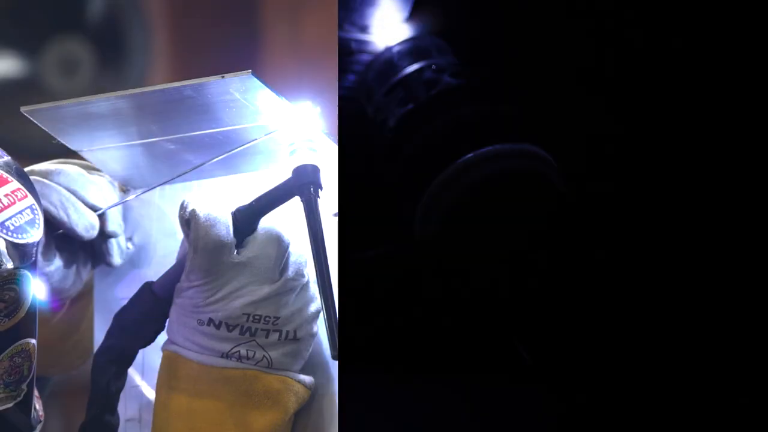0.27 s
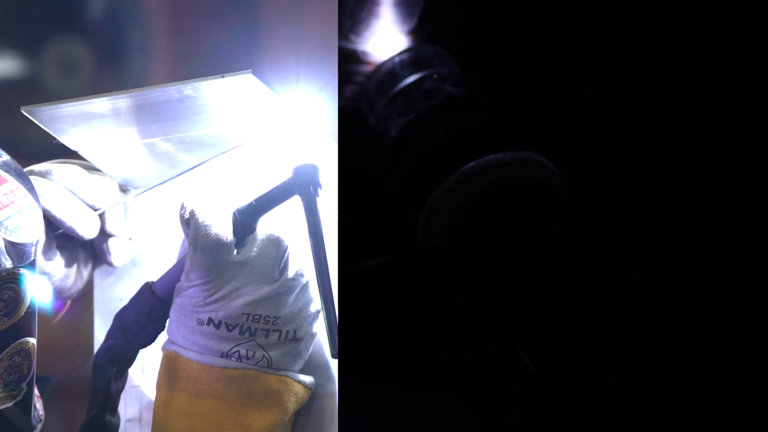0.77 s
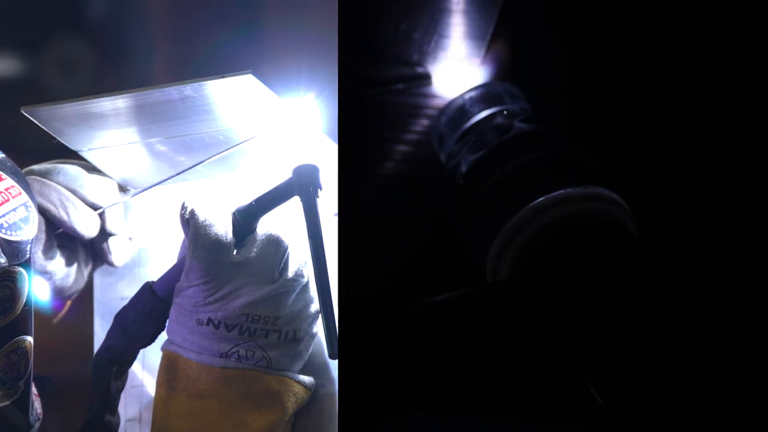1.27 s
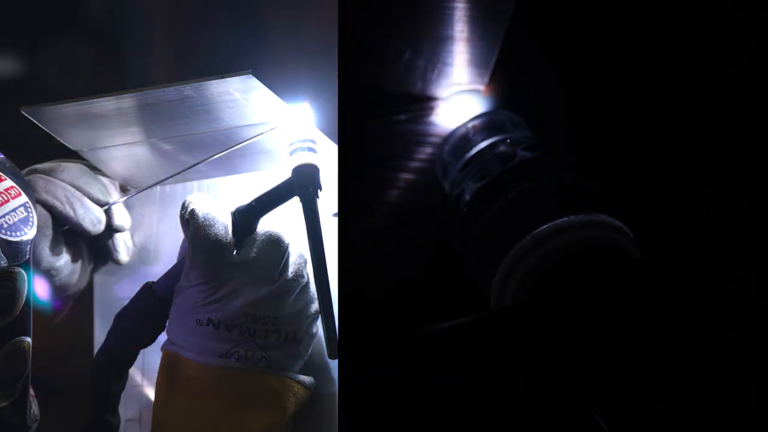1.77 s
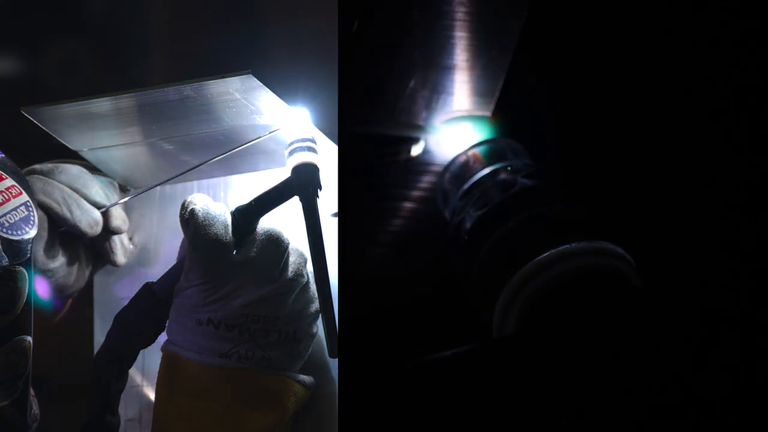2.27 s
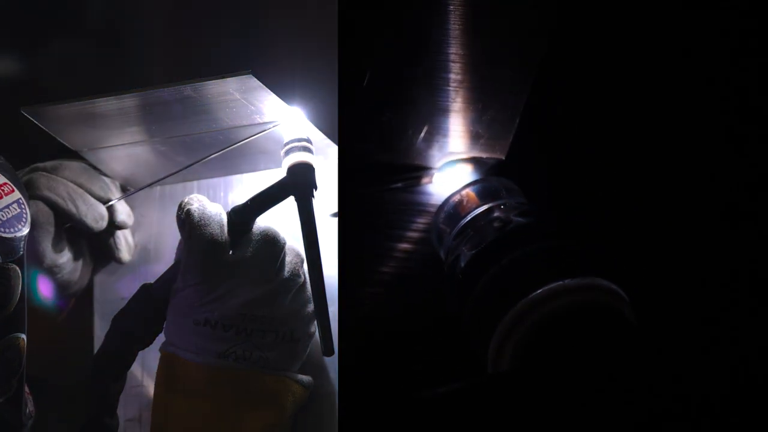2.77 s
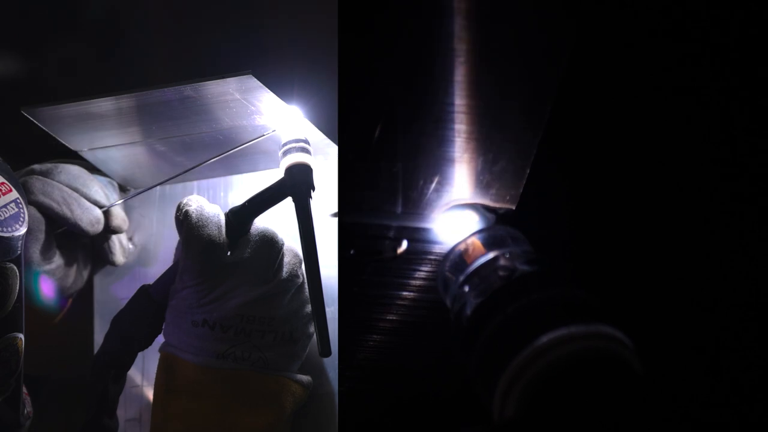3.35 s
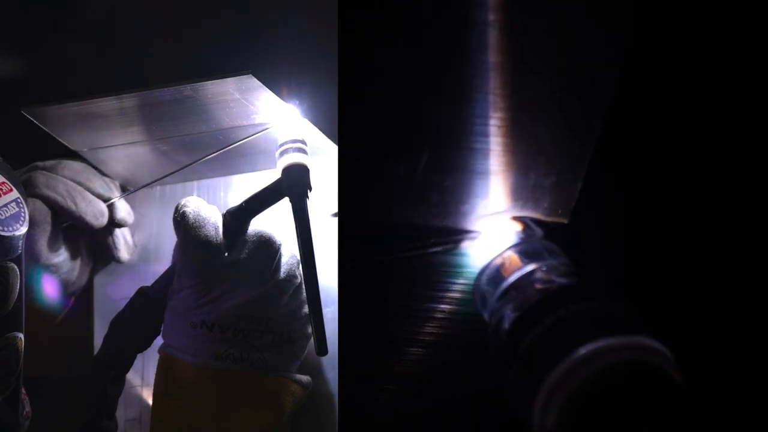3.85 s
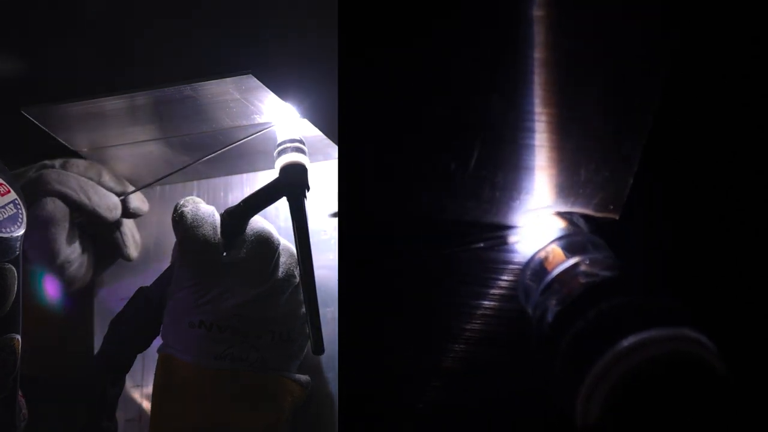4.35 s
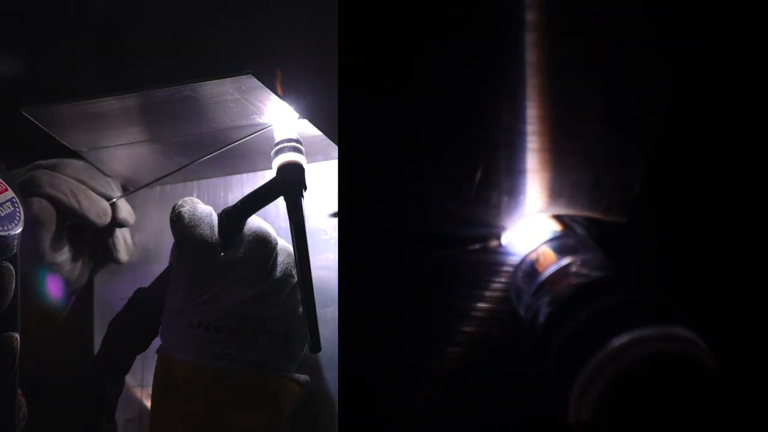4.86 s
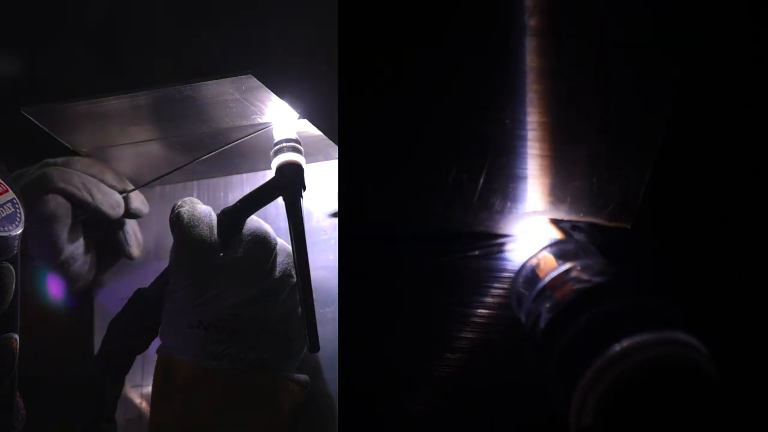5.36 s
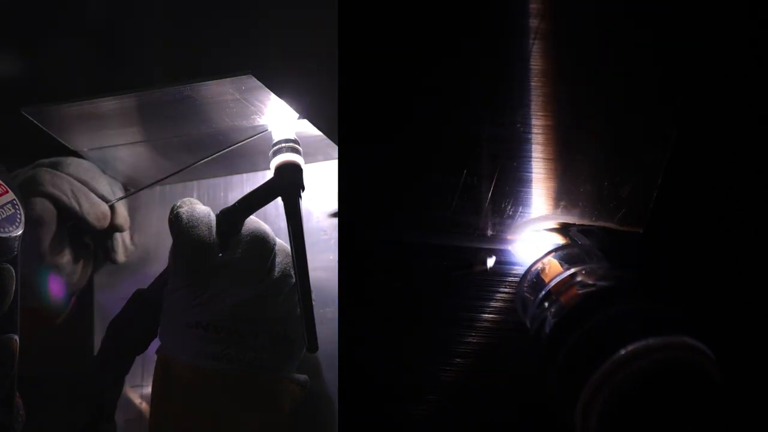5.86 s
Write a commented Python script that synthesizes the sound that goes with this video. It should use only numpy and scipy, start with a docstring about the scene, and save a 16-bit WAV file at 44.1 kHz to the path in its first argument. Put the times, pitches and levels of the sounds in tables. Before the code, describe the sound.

In a workshop, a faint fan hum and soft room noise come first. A welding arc catches with a brief crackle of snaps and thuds, then settles into a harsh, steady low-pitched buzz with a bright, metallic edge and thin hiss. Its rasp grows rougher in patches midway. At the very end two quick blows hit the bench and ring. Close microphone, short reflections.

```python
"""An alternating-current welding arc strikes with a sputter and settles into a steady buzz in a workshop.
The current reverses twice a cycle; each reversal is a click that sets damped resonances ringing:
a crack that echoes between nozzle and plates, and a thump of the plates, which the magnetic force also sways.
A fan hums as a wavering sine, shop and shielding gas sound as shaped noise, and the arc adds its own hiss.
Near the end two quick blows on the bench ring its modes and leave a decaying tail."""
import sys
import numpy as np
from scipy import signal
from scipy.fft import rfft, irfft, next_fast_len
from scipy.io import wavfile

SR = 44100
rng = np.random.default_rng(int(sys.argv[2]) if len(sys.argv) > 2 else 0)


def to_wav(sig):
    """Store sig (one row per channel, or 1-D mono) as 16-bit WAV at the path in sys.argv[1].

    Samples outside -1..1 are clipped; the rate is SR.
    """
    pcm = np.clip(np.atleast_2d(sig), -1, 1) * 32767
    pcm = np.round(pcm).astype(np.int16)
    wavfile.write(sys.argv[1], SR, pcm.T)  # frames by channels


N = 270156
TIME_S = np.arange(N) / SR
CYCLE_HZ, FIRST_CYCLE, SECOND_REVERSAL = 161.015, 53, .617   # the last: share of a cycle after the first
SPUTTER_START_S, SPUTTER_END_S = .217, .335

# the sinking background: time_s, level_db
FADE = [(0., -0.5), (.18, -1), (.3, -6.5), (.5, -4.5), (1.6, -6), (2.7, -9), (3.2, -11), (4.3, -9.5),
        (4.6, -12), (5.3, -9), (5.9, -11)]
# click strengths of the arc: time_s, crack_db, thump_db
ARC_STRENGTH = [(.34, -45, -43), (.38, -35, -36), (.5, -35, -33.5), (.8, -31, -30.5), (1.3, -29, -27.5),
                (1.65, -31, -30.5), (2.05, -30.5, -28), (2.4, -33.5, -31), (2.75, -30, -31),
                (3.3, -34, -34.5), (3.55, -33.5, -34.5), (3.95, -31, -32), (4.5, -31, -33.5),
                (4.8, -34.5, -36), (5.1, -30.5, -33), (5.3, -31.5, -34), (5.5, -33, -33.5),
                (5.9, -34.5, -35.5), (6.12, -34, -34)]
# the torch travels along the joint: time_s, arrival_ms, then four echo heights (ratio to the crack)
TORCH_TRAVEL = [(.45, .075, .62, -.4, .7, 1.2), (1., .133, .55, -.26, .75, .87),
                (1.6, .157, .79, .21, .6, .7), (2.33, .2, .9, .3, .6, .7), (2.8, .232, 1.13, .6, .72, .55),
                (3.1, .244, 1.1, .67, .6, .38), (3.7, .236, 1.36, .6, .85, .5),
                (4.3, .21, 1.43, .92, .5, .16), (4.47, .208, 1.45, .89, .47, .1),
                (4.65, .147, 1.41, .8, .74, .28), (4.9, .124, 1.55, .89, .7, .12),
                (5.15, .116, 1.46, 1., .4, .15), (5.5, .083, 1.62, .97, .32, -.1),
                (6.1, .075, 1.6, 1.07, .5, .17)]
# delays of those echoes, off the nozzle rim, then three faces of the joint: lag_ms
ECHO_LAGS_MS = (.16, .4, .513, .617)


def amp(db):
    """Decibels to amplitude ratio, by the logarithmic definition of level."""
    return 10 ** (np.asarray(db) / 20)


def rms_one(x):
    """Normalisation to unit root-mean-square."""
    return x / np.sqrt(np.mean(x ** 2) + 1e-20)


def read(rows, t):
    """Linear interpolation of a table's columns at times t."""
    s, *columns = np.transpose(rows)
    return [np.interp(t, s, c) for c in columns]


def coloured(spectrum):
    """Spectral shaping: steady white noise weighted over log frequency, at rms 1."""
    size = next_fast_len(N)
    hz = np.maximum(np.arange(size // 2 + 1) * SR / size, 1)
    points = np.array(spectrum)
    gain = amp(np.interp(np.log(hz), np.log(points[:, 0]), points[:, 1]))
    white = rng.standard_normal(size)
    return rms_one(irfft(rfft(white) * gain, size)[:N])


def drift(rate_hz):
    """Low-pass random motion: noise through a double pole, at rms 1."""
    r = np.exp(-2 * np.pi * rate_hz / SR)
    white = rng.standard_normal(N + SR)
    return rms_one(signal.lfilter([1], [1, -2 * r, r * r], white)[SR:])


def clicks(times, sizes):
    """Band-limited impulses: windowed sincs between samples keep the harmonics of a steady train clean."""
    at, taps = np.asarray(times)[:, None] * SR, np.arange(-8, 9)
    index = np.round(at).astype(int) + taps
    shape = np.sinc(index - at) * np.cos(np.pi * (index - at) / 19) ** 2
    heights = shape * np.asarray(sizes)[:, None]
    return np.bincount(index.ravel(), heights.ravel(), N + SR)[:N]


def ring(train, modes):
    """Modal impulse response: each click sets damped sines ringing, normalised to a peak of 1."""
    t = np.arange(2048) / SR
    body = sum(amp(db) * np.exp(-np.pi * width * t) * np.sin(2 * np.pi * hz * t) for hz, width, db in modes)
    return signal.fftconvolve(train, body / np.abs(body).max())[:N]


def band(x, low_hz, high_hz, order):
    """Butterworth band-pass: maximally flat between the two corners."""
    return signal.sosfilt(signal.butter(order, [low_hz, high_hz], "band", fs=SR, output="sos"), x)


def fan_hum(fade_db):
    """Frequency modulation: a sine whose pitch wanders; it sinks faster than the noise."""
    pitch_hz = 286.2 + 1.31 * drift(3.0)
    phase = 2 * np.pi * np.cumsum(pitch_hz) / SR
    return np.sqrt(2) * amp(-46 + 1.49 * fade_db) * np.sin(phase)


def shop_and_gas(fade_db):
    """Turbulence and diffuse room sound: two coloured noises under one slow fade."""
    # shop noise spectrum, relative density: frequency_hz, density_db
    shop_spectrum = [(25, -4), (60, -15), (130, -7), (250, 1.5), (450, 4.5), (900, -1.5), (1400, -7.5),
                     (2400, -7.5), (3500, -22), (6000, -30), (14000, -38)]
    # shielding gas spectrum, relative density: frequency_hz, density_db
    gas_spectrum = [(2060, -34), (3500, -13), (4740, -22), (5830, -24), (7180, -17), (8570, -16),
                    (9500, -5), (10300, -5), (11200, -3.5), (13100, -22), (15800, -36)]
    return amp(fade_db) * (amp(-51) * coloured(shop_spectrum) + amp(-62.5) * coloured(gas_spectrum))


def arc_hiss():
    """Amplitude-modulated band noise: its level follows the cracks from the strike onward."""
    crack_db = read(ARC_STRENGTH, TIME_S)[0]
    noise = rms_one(band(rng.standard_normal(N), 3900, 5500, order=2))
    return amp(-48 + crack_db) * (TIME_S > SPUTTER_START_S) * noise


def background():
    """Superposition of the fan tone, shop noise, gas hiss and arc hiss."""
    fade_db, = read(FADE, TIME_S)
    return fan_hum(fade_db) + arc_hiss() + shop_and_gas(fade_db)


def sputter():
    """Random point process: tiny sparks of chance size and sign fly while the arc strikes."""
    sparks_per_s, level_db, spread_db = 1500, -49, 4
    striking = (TIME_S > SPUTTER_START_S) & (TIME_S < SPUTTER_END_S)
    born = (rng.random(N) < sparks_per_s / SR) & striking
    return born * amp(level_db + spread_db * rng.standard_normal(N)) * rng.choice([-1, 1], N)


def sparks_and_pops():
    """Impulsive discharge: unsteady pops each give a spark and a damped thud; returns sparks and pops."""
    # pops, click levels ahead of the filters: time_s, thud_db, snap_db
    pop_rows = [(.2168, -20, -28), (0.224, -38, -27), (.2303, -29, -29), (0.2366, -21, -38),
                (.246, -43, -43), (0.252, -37, -37), (.2583, -24.5, -30), (.267, -45, -38),
                (0.273, -34, -41), (.281, -40, -29), (0.2824, -29, -28), (.288, -38, -43),
                (0.295, -25, -38), (0.2987, -30, -32), (0.3046, -27, -26), (.3110, -26.5, -24),
                (.318, -38, -41), (0.3234, -29, -38), (.3275, -43, -30), (0.335, -38, -36),
                (0.468, -35, -61), (.8175, -32.5, -64), (.923, -32.5, -63), (0.965, -36, -64),
                (1.577, -31.5, -60), (1.639, -31, -61), (5.2155, -53, -44), (5.228, -33.5, -44)]
    # resonances of a thud: frequency_hz, width_hz, level_db
    thud_modes = [(907, 240, -1.5), (1490, 780, -6)]
    pop_s, thud_db, snap_db = np.transpose(pop_rows)
    sparks = clicks(pop_s, amp(snap_db)) + sputter()
    thuds = band(ring(clicks(pop_s, amp(thud_db)), thud_modes), 510, 2750, order=1)
    snaps = amp(-2) * band(sparks, 1500, 6400, order=1)
    return sparks, thuds + snaps


def hard_restrikes(second, luck):
    """Irregular re-ignition: extra dB of each second reversal, in set runs and in lone ones by chance."""
    # runs of hard re-strikes: start_s, length_s, extra_db
    hard_runs = [(.411, .012, 6), (.467, .006, 5), (.504, .006, 5), (1.926, .006, 6), (1.945, .031, 8),
                 (1.982, .012, 8), (2.001, .056, 8), (2.075, .006, 8.5), (2.088, .068, 7),
                 (2.162, .062, 6.5), (2.231, .031, 9.5), (2.274, .006, 5), (2.299, .012, 4.5),
                 (2.398, .012, 8), (2.522, .006, 7), (2.659, .006, 7.5), (2.796, .044, 4.5),
                 (2.845, .006, 9), (2.876, .006, 8), (2.889, .05, 10.5), (2.945, .037, 11),
                 (2.988, .012, 8.5), (3.007, .012, 6), (3.032, .006, 11), (3.063, .006, 8.5),
                 (3.088, .006, 8.5), (3.113, .037, 10), (3.156, .019, 7.5), (3.181, .012, 7.5),
                 (3.206, .019, 8.5), (3.243, .019, 7), (3.268, .037, 5), (5.194, .031, 6), (5.361, .006, 4),
                 (5.367, .025, 11), (5.764, .006, 8.5)]
    # spells of lone hard re-strikes: start_s, end_s, share_of_cycles, extra_db
    lone_spells = [(.37, .41, .4, 3.5), (.55, 1.92, .035, 3), (2.31, 2.52, .3, 3), (2.53, 2.79, .25, 4.5),
                   (3.31, 3.4, .3, 3.5), (3.4, 6.1, .03, 2.5)]
    runs = sum(db * ((second >= s) & (second < s + length)) for s, length, db in hard_runs)
    lone = sum(db * ((second >= start) & (second < end) & (luck < share))
               for start, end, share, db in lone_spells)
    return np.maximum(runs, lone)


def surges(t):
    """Gated gain: extra dB of the first crack, the second thump and the second sway at times t."""
    # surges of a few cycles: start_s, length_s, crack_db, thump_db, sway_db
    surge_rows = [(1.394, .018, 4, 5, 10), (3.908, .012, 0, 4, 9), (5.2, .031, 0, 4, 7),
                  (5.367, .025, 0, 7, 10)]
    return sum(np.outer(dbs, (t >= s) & (t < s + length)) for s, length, *dbs in surge_rows)


def echoing_cracks(times, forward, back, echoes, sparks):
    """Comb interference: cracks, opposed rebounds and sparks repeat at the echo lags, then ring."""
    # resonances of a crack: frequency_hz, width_hz, level_db
    crack_modes = [(8040, 5800, 0), (13100, 2150, -15.5), (9930, 1320, -16), (14600, 590, -25),
                   (15700, 460, -29.5)]
    rebound_s = .022e-3
    lags_ms = (0, *ECHO_LAGS_MS)
    train = 0
    for lag_ms, height in zip(lags_ms, (1, *TORCH_TRAVEL[0][2:])):   # sparks keep the first row's heights
        train = train + amp(-6.5) * height * np.roll(sparks, int(lag_ms * SR / 1000))
    for lag_ms, height in zip(lags_ms, (np.ones(len(times) // 2), *echoes)):
        at, height = times + lag_ms / 1000, np.tile(height, 2)
        train = train + clicks(at, -forward * height) + clicks(at + rebound_s, back * height)
    return band(ring(train, crack_modes), 6140, 16200, order=4)


def carve_hollows(bright):
    """Anti-resonance: shares of four resonant bands are taken away, and negative shares fill them."""
    # centres of the hollows: frequency_hz
    hollow_hz = (5600, 10600, 12400, 14800)
    # hollows that deepen and fill as the torch moves: time_s, then share taken away at each centre (ratio)
    hollow_depths = [(.4, 0.73, -0.05, -0.92, .3), (1.2, 0.47, 0.26, -0.24, .3),
                     (2., .6, -0.16, -0.18, 0.28), (2.9, 0.45, 0.048, -0.053, .2),
                     (3.7, 0.57, 0.19, -.2, 0.27), (4.5, 0.37, .1, 0.058, .4),
                     (5.2, 0.65, -0.25, -0.094, .4), (6., 0.7, -0.064, -0.15, .5)]
    for hz, share in zip(hollow_hz, read(hollow_depths, TIME_S)):
        bright = bright - share * signal.lfilter(*signal.iirpeak(hz, 11, fs=SR), bright)
    return bright


def low_ring(times, crack, hard_db):
    """A lower resonance of each crack, weaker as the torch moves on; hard re-strikes add nothing to it."""
    # modes of the lower ring: frequency_hz, width_hz, level_db
    lower_modes = [(6600, 1400, -3), (5000, 370, -7.5)]
    fading_db = -12.5 - 2.5 * times   # vs crack; -2.5 dB per second
    size = crack * amp(fading_db - np.r_[0 * hard_db, hard_db])
    return band(ring(clicks(times, -size), lower_modes), 5030, 5840, order=2)


def plate_thumps(times, thump):
    """Forced plate vibration: each reversal strikes the modes; the upper sway's sign follows the current."""
    # modes of the plates: frequency_hz, width_hz, level_db
    plate_modes = [(863, 170, 5), (1070.4, 87, -3.5), (1392, 280, -2), (1490, 1630, 2.5), (1963, 87, -16),
                   (2250, 560, 1), (2230, 350, -9.5), (2770, 300, -30), (2700, 410, -32), (2930, 41, -19),
                   (4260, 490, -3)]
    # upper modes driven by the alternating force: frequency_hz, width_hz, level_db
    upper_modes = [(2737, 120, 0), (3550, 150, -9)]
    beats = clicks(times, -thump)
    low = band(ring(beats, plate_modes), 940, 2690, order=2)
    high = amp(-23.5) * band(ring(beats, [(5176, 270, 0)]), 3800, 5095, order=2)
    sign = np.repeat([1, -1], len(times) // 2)
    alternating = clicks(times, amp(-32) * sign * thump)
    return low + high + band(ring(alternating, upper_modes), 2400, 4400, order=2)


def plate_sway(first, second, flutter_db):
    """Magnetic force: the field of the current pushes and pulls the plates, changing sign with it."""
    # strength of the sway: time_s, sway_db, deep_db
    sway_rows = [(.34, -61, -67), (.7, -66, -65), (1.4, -50.5, -64), (1.75, -56.5, -62),
                 (2.3, -50.5, -62.5), (2.9, -62.5, -65), (3.5, -56, -73), (4.5, -57, -70), (5.1, -53, -70),
                 (6.0, -61.5, -66)]
    # modes of the sway: frequency_hz, width_hz, level_db
    sway_modes = [(703, 64, 3), (1046, 940, -40)]
    # deep modes of the sway: frequency_hz, width_hz, level_db
    deep_modes = [(152, 84, -4), (334, 42, 5), (450, 50, 0.5)]
    sway, deep = amp(read(sway_rows, first))
    both = np.r_[first, second]
    pushes = ring(clicks(both + 0.000083, np.r_[sway, -sway * amp(surges(second)[2])]), sway_modes)
    pushes = pushes + ring(clicks(both, np.r_[deep, -deep]), deep_modes)
    # uneven cycles shake the bench, in proportion to their unsteadiness
    pushes = pushes + ring(clicks(second, amp(-76) * flutter_db), [(172, 60, 0)])
    return band(pushes, 120, 1600, order=2)


def arc():
    """Periodic excitation: two uneven reversals a cycle, with pops; returns the treble, pops and body."""
    # second reversal vs first: time_s, crack_ratio, rebound_ratio, thump_db, unsteady_db
    second_rows = [(.4, 1, 0.8, -3, 3), (1.0, 0.75, 0.79, 1.5, 0.9), (1.7, 0.4, 0.8, 1.5, 1),
                   (2.4, 0.71, 0.78, -3.5, 3), (2.9, 0.3, 0.73, -4.5, 3), (3.3, 0.41, 0.76, -2.5, 1.5),
                   (4., 0.6, 0.28, -4, -1.5), (4.47, 0.27, 0.45, 0, 1), (4.58, 0.22, 0.76, -3.5, 2),
                   (4.9, 0.42, 0.49, -1.5, 1), (5.5, 0.16, 0.48, -1.5, 2), (6.1, 0.16, 0.75, -7, .8)]
    sent = np.arange(FIRST_CYCLE, int(N / SR * CYCLE_HZ)) / CYCLE_HZ
    later_ms, *echoes = read(TORCH_TRAVEL, sent)
    first = sent + later_ms / 1000
    second = first + SECOND_REVERSAL / CYCLE_HZ
    crack_db, thump_db = read(ARC_STRENGTH, first)
    crack2, rebound, thump2_db, unsteady_db = read(second_rows, first)
    chance = rng.standard_normal((len(first), 7)).T
    hard_db = hard_restrikes(second, rng.random(len(first))) * (1 + .08 * chance[0])

    # a hard re-strike comes late, is mostly rebound, thumps less and is steadier
    late_s = 3e-6 * unsteady_db * chance[2] + 2e-6 * hard_db
    times = np.r_[first + 1.5e-6 * chance[1], second + late_s]
    first_crack_db = crack_db + surges(first)[0] + .5 * chance[3]
    unsteady_share = np.where(hard_db > 0, .3, 1)
    second_crack_db = crack_db + hard_db + unsteady_share * unsteady_db * chance[4]
    crack = amp(np.r_[first_crack_db, second_crack_db])
    forward = crack * np.r_[1 + 0 * first, crack2 * amp(-1.2 * hard_db)]
    back = crack * np.r_[0 * first, rebound]

    second_thump_db = thump_db + thump2_db + surges(second)[1] - .4 * hard_db + .7 * unsteady_db * chance[5]
    # thumps are uneven at first (2 dB spread) and settle with a time constant of 0.48 s
    settling_db = 2 * np.exp((first[0] - times) / .48) * rng.standard_normal(len(times))
    thump = amp(np.r_[thump_db, second_thump_db] + settling_db)

    sparks, pops = sparks_and_pops()
    bright = carve_hollows(echoing_cracks(times, forward, back, echoes, sparks))
    bright = bright + low_ring(times, crack, hard_db)
    body = plate_thumps(times, thump) + plate_sway(first, second, unsteady_db * chance[6])
    return bright, pops, body


def nearby_echoes(x, t60):
    """Diffuse reverberation: dense reflections from bench and walls, from 0.6 ms on, at unit energy."""
    t = np.arange(int(.15 * SR)) / SR
    tail = rng.standard_normal(len(t)) * amp(-60 * t / t60) * (t > .0006)
    return signal.fftconvolve(x, tail / np.sqrt(np.sum(tail ** 2)))[:N]


def bench_blows(knocks):
    """Modal impact: two quick blows and small rattles each ring a mode of their own and the bench."""
    # modes of the bench: frequency_hz, width_hz, level_db
    bench_modes = [(140, 81, -35), (320, 360, -2.5), (1080, 240, -0.5), (3000, 650, -2.5), (3830, 140, -17),
                   (5600, 250, -18)]
    out = np.zeros(N)
    for s, db, hz in knocks:
        # light, high rattles hardly move the bench
        moved = [(f, w, level_db - hz / 300) for f, w, level_db in bench_modes]
        out += ring(clicks([s], [-amp(db)]), [(hz, min(.5 * hz, 900), 0)] + moved)
    return out


def knock_tail(start_s):
    """Exponential decay: ringing modes, a brighter, shorter noise and a longer one die in the shop."""
    # what rings on after the blows: frequency_hz, level_db, t60_s
    after_rings = [(641, -49, .3), (848, -62, .3), (1416, -50, .25), (1624, -48, 0.47), (2100, -60, .5),
                   (2686, -57, 0.13), (3058, -54, .2)]
    # spectrum of the longer noise, relative density: frequency_hz, density_db
    tail_spectrum = [(24, -50), (40, -2), (141, 4), (527, -5.5), (623, -0.5), (1010, -5.5), (1380, -4),
                     (1890, -9.5), (6000, -30.5), (7800, -44), (13200, -120)]
    since = TIME_S - start_s
    after = np.maximum(since, 0)
    uneven = amp(1.3 * drift(89))   # separate late reflections
    out = np.zeros(N)
    for hz, db, t60 in after_rings:
        out += amp(db - 60 * after / t60) * np.sin(2 * np.pi * hz * after)
    early_noise = rms_one(band(rng.standard_normal(N), 1400, 2900, order=2))
    out += amp(-44 - 60 * after / .2) * (since > 0) * uneven * early_noise
    swell = np.clip(since / 0.00076, 0, 1) * amp(-60 * after / 0.51)
    return out + amp(-35.0) * swell * uneven * coloured(tail_spectrum)


def knock():
    """Impact and reverberation: the blows on the bench with the tail that starts at the first."""
    # blows and rattles: start_s, peak_db, ring_hz
    knock_rows = [(5.9982, -11.5, 740), (6.0014, -18.5, 840), (6.012, -34, 1500), (6.0185, -41, 1500),
                  (6.032, -35, 2600), (6.035, -30, 7600), (6.043, -36, 2900), (6.054, -39, 5070),
                  (6.062, -43, 1510), (6.081, -38, 4660), (6.094, -47, 2200), (6.112, -47, 850)]
    return bench_blows(knock_rows) + knock_tail(knock_rows[0][0])


def scene():
    """Superposition of direct sound, nearby echoes, background and knock."""
    bright, pops, body = arc()
    turn = 1.77 * np.arange(N) / N * np.pi   # the treble reflections change as the torch moves
    moving = np.cos(turn) * nearby_echoes(bright, t60=.03) + np.sin(turn) * nearby_echoes(bright, t60=.03)
    ringing = amp(-16) * nearby_echoes(body + amp(-4) * pops, t60=.08)
    echoes = amp(-8) * moving + ringing
    return (bright + pops + body + echoes + background() + knock())[None]


def record(dry):
    """Band limiting: a high-pass weakens the deepest bass and a steep elliptic low-pass cuts the top."""
    lean = signal.sosfilt(signal.butter(2, 70, "high", fs=SR, output="sos"), dry)
    return signal.sosfilt(signal.ellip(14, .3, 75, 15810, fs=SR, output="sos"), lean)


dry = scene()
out = record(dry)
to_wav(out)
```